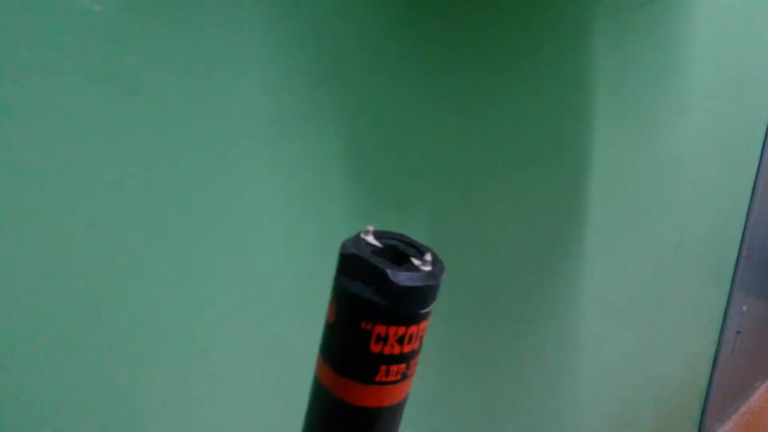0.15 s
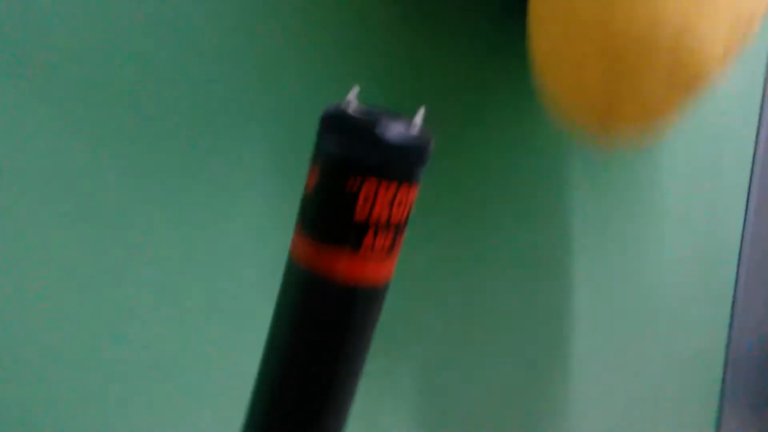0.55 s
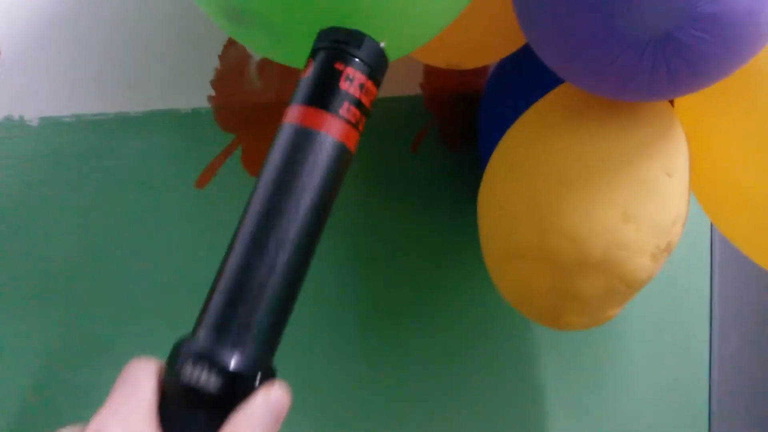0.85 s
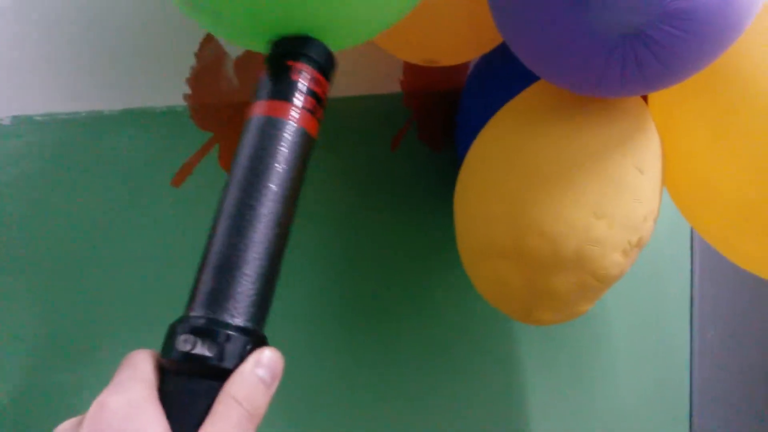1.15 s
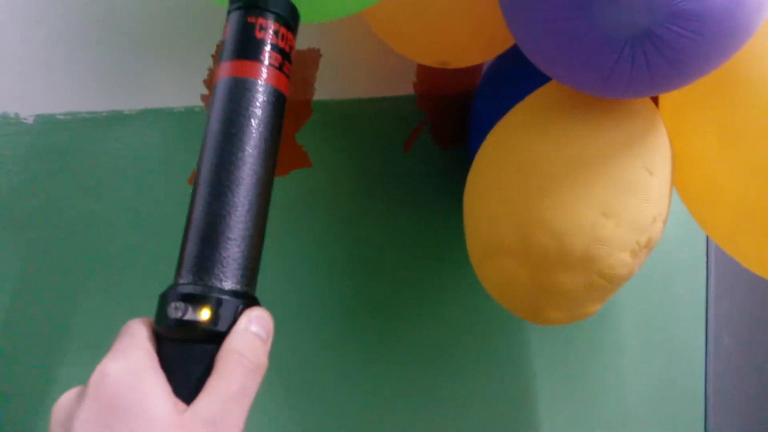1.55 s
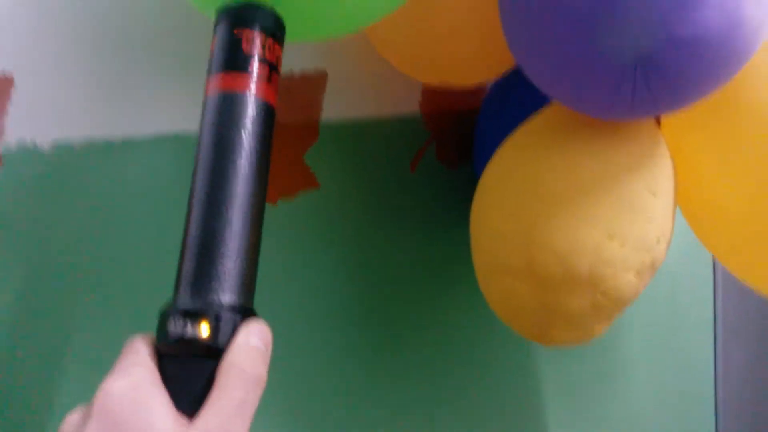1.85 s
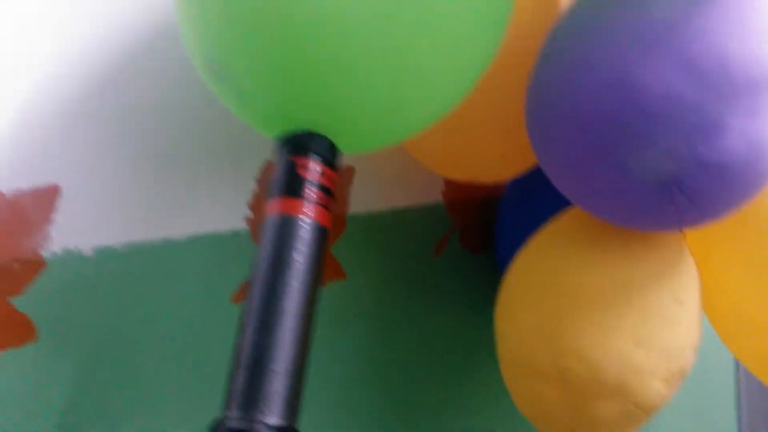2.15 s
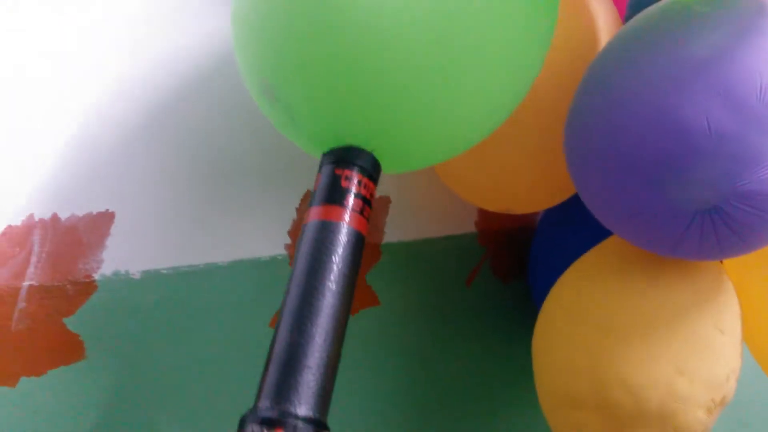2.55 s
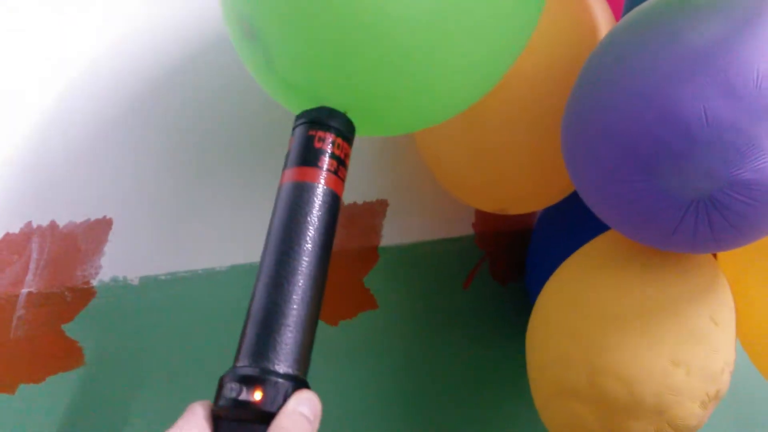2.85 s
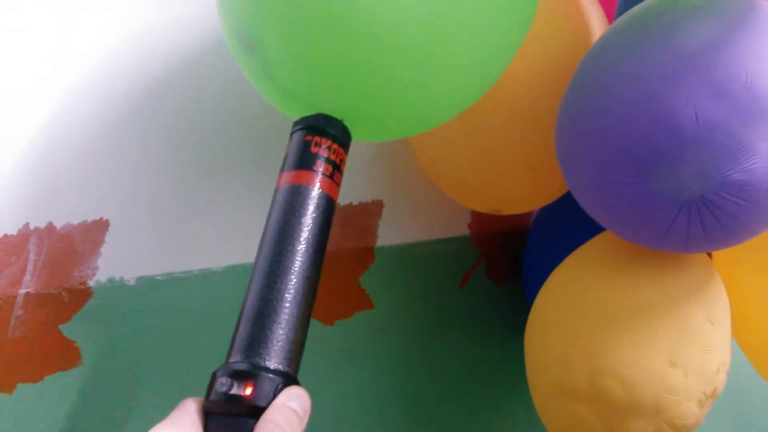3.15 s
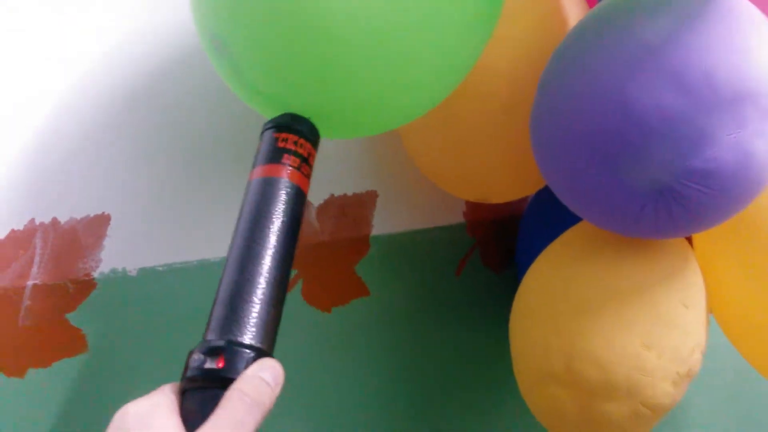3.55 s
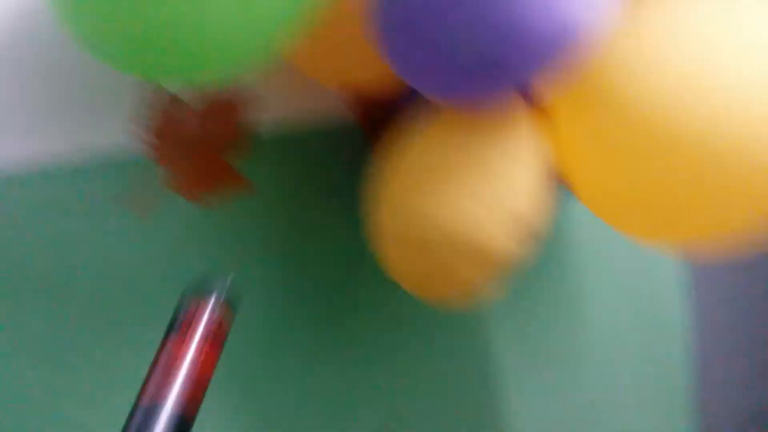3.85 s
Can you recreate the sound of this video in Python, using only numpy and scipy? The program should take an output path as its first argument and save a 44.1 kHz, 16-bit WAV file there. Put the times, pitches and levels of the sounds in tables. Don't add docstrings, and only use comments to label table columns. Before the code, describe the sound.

Harsh electric crackle of a hand-held stun gun, two brief bursts, then a long slowing buzz

```python
import sys
import numpy as np
from scipy import signal
from scipy.io import wavfile
from scipy.ndimage import uniform_filter1d

SR = 44100
rng = np.random.default_rng(int(sys.argv[2]) if len(sys.argv) > 2 else 0)


def ratio(d):
    e = np.asarray(d, float) / 20
    return 10 ** e


def pcm_store(signal):
    levels = np.round(np.clip(np.atleast_2d(signal), -1, 1) * 32767)
    wavfile.write(sys.argv[1], SR, levels.astype(np.int16).T)


N = 176400
RUN_IN_S = .25
PAD = int(RUN_IN_S * SR)

# time_s, rate_hz
ARC_1 = [(0.0, 84.55), (0.1, 78.82), (0.195, 75.61)]
ARC_2 = [(0.368, 85.17), (0.49, 74.6)]
ARC_3 = [(1.603, 87.13), (1.75, 76.05), (2.1, 70.35), (2.5, 65.63), (2.8, 59.72), (3.0, 55.29),
         (3.15, 50.81), (3.28, 44.32), (3.36, 39.42), (3.42, 39.16), (3.745, 38.18)]
ARCS = (ARC_1, ARC_2, ARC_3)
CHARGE_LEFT = [.78, .33, .29]
# time_s, direct_db, hall_db, jolt_left_db, jolt_right_db
REACH = [(0, -0.5, -23, -16, -24), (.37, -0.5, -19.5, -17.5, -29), (0.502, 0, -25.5, -17, -34),
         (1.6, -5, -22, -18, -24.5), (1.9, -6, -22, -23, -32), (2.2, -6, -21.5, -24.5, -29),
         (2.33, -7.5, -21.5, -20, -25), (2.45, -6.5, -20.5, -25.5, -29), (2.7, -7.5, -22, -25.5, -31.5),
         (3.1, -6, -22.5, -22, -27.5), (3.75, -4.5, -21.5, -34, -37)]
# time_s, treble_share_0_1
AIM = [(0, 0.43), (.3, 0.36), (.6, 0.27), (1.6, 0), (2.0, 0.36), (2.6, 0), (3.201, 0.09), (3.801, 0.05)]
# left_ms, left_db, right_ms, right_db
NEAR_BOUNCES = [(0.1, 0, 0, 0), (1.35, -9, .9, -7), (1.85, -6, 1.7, -6), (3.3, -17, 3.2, -13),
                (4.0, -17, 3.9, -14), (6.0, -16, 6.0, -11), (6.4, -13, 6.4, -13)]
# left_ms, left_db, right_ms, right_db
FAR_BOUNCES = [(0.1, 0, 0, 0), (1.3, 1, 1.0, -1), (2.3, -5, 1.7, -2), (3.1, -6, 3.3, -6),
               (4.3, -3, 4.2, -4), (5.2, -6, 4.9, -9), (7.6, -10, 8.4, -8)]
# band_hz, t60_s
HALL_T60 = [(200, 1.33), (1000, 1.41), (2600, 0.94), (5000, 0.61), (7500, 0.64), (10000, 0.36),
            (13000, 0.069)]
# band_hz, level_db
HALL_COLOUR = [(200, 17.5), (4000, 1.5), (9000, 0), (13000, 12.5)]
# left_hz, right_hz, width_hz, level_db
PORTS = [(3130, 2400, 3000, -20), (4996, 5010, 1224, -1.5), (7370, 8190, 843, 1),
         (13500, 12450, 2600, -17.5), (6760, 6700, 440, -10.5), (5250, 5475, 473, -6)]
PORT_SIGNS = [1, -1, 1, 1, 1, -1]
# time_s, left_swing, right_swing
OVERLOADS = [(-.002, -0.55, -0.38), (.0095, -0.5, -0.3), (0.033, -0.13, -0.16), (.0703, -0.2, 0.023),
             (0.0834, -.09, -0.073), (0.0947, 0.13, -0.27), (0.1208, -0.036, 0.69), (0.1463, -0.31, -0.079),
             (.1727, -0.2, -0.021), (0.372, 0.11, -0.17), (0.4466, 0.23, 0.076)]
SWITCH_S = [
    .3655,
    1.596,
    3.746,
]
SWITCH_DB = [-21, -16]
SWITCH_GRIP_DB = [-8, 1.5, 5.5]
# start_s, level_db, left_minus_right_db
STEPS = [(.04, -37, -5), (0.637, -36, -4.5), (1.203, -37, -4.5), (1.795, -39, -8), (2.405, -37.5, -7),
         (3.0, -42, -11.5), (3.62, -31, -3.5)]
# band_hz, level_db
STEP_COLOUR = [(50, -32), (130, -15.5), (330, -0.5), (500, -5.5), (700, -7), (1000, -19), (1500, -20),
               (3000, -38)]
# time_s, level_db
RUSTLE = [(0.75, -77), (0.814, -67), (0.868, -56), (1.082, -80), (1.306, -87), (1.318, -72.5),
          (1.482, -53.5), (1.59, -62)]
# centre_hz, width_hz, level_db
CLOTH = [(3000, 1700, -5.5), (7360, 1760, 2), (5300, 1200, -6)]
# start_s, length_s, level_db
SCRAPES = [(3.937, .012, -30), (3.953, .013, -31), (3.968, .016, -31), (3.987, .013, -29)]
# centre_hz, width_hz, level_db
SQUEAKS = [(3470, 970, -7), (7350, 2700, -9)]
# time_s, swing
KNOCKS = [(3.938, .03), (3.948, .09), (3.981, .05), (3.998, .05)]
# band_hz, level_db
FLOOR = [(18, -44), (30, 23), (158, -58), (337, 12), (680, 8), (1480, -15), (5440, -14.5), (7240, -5),
         (15000, -60)]


def rms_one(x):
    return x / np.sqrt(np.mean(x ** 2) + 1e-20)


def butter(x, order, hz, kind="low"):
    return signal.sosfilt(signal.butter(order, hz, kind, fs=SR, output="sos"), x)


def place(seconds, sizes):
    track = np.zeros(N + PAD) + 1e-18
    at = np.round(np.asarray(seconds) * SR).astype(int) + PAD
    np.add.at(track, np.clip(at, 0, N + PAD - 1), sizes)
    return track


def resonate(x, hz, width_hz):
    r = np.exp(-np.pi * width_hz / SR)
    poles = [1, -2 * r * np.cos(2 * np.pi * hz / SR), r * r]
    return signal.lfilter([(1 - r * r) / 2, 0, (r * r - 1) / 2], poles, x)


def resonate_twice(x, hz, width_hz):
    return resonate(resonate(x, hz, width_hz), hz, width_hz)


def bands(length, colour, dying):
    t = np.arange(length) / SR
    white = rng.standard_normal((2, 2, length))
    colour_hz, colour_db = np.transpose(colour)
    hall_hz, hall_t60_s = np.transpose(HALL_T60)
    edges_hz = 35 * 2 ** np.arange(0, 9.1, .5)
    out = 0
    for k, (low_hz, high_hz) in enumerate(zip(edges_hz, edges_hz[1:])):
        log_hz = np.log(low_hz * high_hz) / 2
        db = np.interp(log_hz, np.log(colour_hz), colour_db)
        t60_s = np.interp(log_hz, np.log(hall_hz), hall_t60_s)
        out = out + ratio(db - dying * 60 * t / t60_s) * butter(white[k % 2], 2, [low_hz, high_hz], "band")
    return out


def ports(x):
    x = butter(x, 3, 1580, "high")
    out = np.zeros(x.shape)
    for row, sign in zip(PORTS, PORT_SIGNS):
        for side in range(2):
            out[side] += sign * ratio(row[3]) * resonate(x[side], row[side], row[2])
    return out


def jolt(track, ms):
    r = np.exp(-1000 / (ms * SR))
    push = signal.lfilter([1], [1, -r], track)
    push = signal.lfilter([1 - r ** 4], [1, -r ** 4], push)
    return butter(push, 2, 83, "high")


def room_noise():
    return ratio(-61) * rms_one(bands(N, FLOOR, 0))


def footfalls():
    likeness, rise_s = 0.76, .004
    t = np.arange(SR) / SR
    out = np.zeros((2, N + 2 * SR))
    for start_s, level_db, pan_db in STEPS:
        noise = bands(SR + 800, STEP_COLOUR, 1)[:, 800:]
        mid, side = butter(noise, 2, 1295)
        boom = np.sqrt(1 + likeness) * mid + np.sqrt(1 - likeness) * side * [[1], [-1]]
        boom = boom * (1 - np.exp(-t / rise_s)) * (1 - t ** 8)
        side_db = pan_db * np.array([[.5], [-.5]])
        start = int(start_s * SR)
        out[:, start:start + SR] += rms_one(boom) * ratio(level_db - 14.5 + side_db)
    return out[:, :N]


def rustle():
    hiss = rng.standard_normal((2, N))
    cloth = rms_one(sum(ratio(db) * resonate_twice(hiss, hz, width_hz) for hz, width_hz, db in CLOTH))
    time_s, level_db = np.transpose(RUSTLE)
    return cloth * ratio(np.interp(np.arange(N) / SR, time_s, level_db, left=-90, right=-90) - 0.5)


def switch_clicks():
    t, t60_s = np.arange(N) / SR, 0.018
    decay = 0
    for start_s, grip_db in zip(SWITCH_S, SWITCH_GRIP_DB):
        decay = decay + (t > start_s) * ratio(grip_db - 60 * np.abs(t - start_s) / t60_s)
    snap = resonate(rng.standard_normal((2, N)) * decay, 8100, 1160)
    return snap * ratio(np.array(SWITCH_DB)[:, None] + 13)


def hand_on_case():
    t = np.arange(N) / SR
    slips_per_s, slip_depth, release_s = 900, .3, .003
    slips = rms_one(uniform_filter1d(rng.standard_normal(N), size=int(SR / slips_per_s)))
    grains = (rng.standard_normal((2, N)) + rng.standard_normal(N)) * np.exp(slip_depth * slips)
    rub = ratio(-1) * rms_one(ports(grains))
    for hz, width_hz, db in SQUEAKS:
        rub = rub + ratio(db) * rms_one(resonate_twice(grains, hz, width_hz))
    rub = rub + ratio(-7.5) * rms_one(resonate(grains, 463, 980))
    stroke = 0
    for start_s, length_s, db in SCRAPES:
        rise = np.clip((t - start_s) / length_s, 0, 1) ** .5
        fall = np.exp(-np.maximum(t - start_s - length_s, 0) / release_s)
        stroke = stroke + ratio(db) * rise * fall
    return rub * stroke + jolt(place(*np.transpose(KNOCKS)), .8)[PAD:]


def spark_times():
    times = []
    for arc, left, before_s in zip(ARCS, CHARGE_LEFT, (RUN_IN_S, 0, 0)):
        time_s, rate_hz = np.transpose(arc)
        t = np.arange(time_s[0] - before_s, time_s[-1], 1 / SR)
        cycles = np.cumsum(np.interp(t, time_s, rate_hz)) / SR - before_s * rate_hz[0] - left
        times.append(np.interp(np.arange(np.ceil(cycles[0]), cycles[-1]), cycles, t))
    return np.concatenate(times)


def hall_tail():
    t = np.arange(int(1.5 * SR)) / SR
    rise_s, air_cut_hz, air_t60_s = .005, 10800, 0.27
    scatter_db, scatter_t60_s = 5, .015
    tail = bands(len(t), HALL_COLOUR, 0.99) * (1 - np.exp(-t / rise_s))
    dull = signal.sosfiltfilt(signal.butter(8, air_cut_hz, fs=SR, output="sos"), tail)
    tail = dull + (tail - dull) * ratio(-60 * t / air_t60_s)
    return tail + rng.standard_normal(tail.shape) * ratio(scatter_db - 60 * t / scatter_t60_s)


def luck(*shape):
    return np.clip(rng.standard_normal(shape), -1.7, 1.7)


def spark_cracks(spark_s, own_db):
    bounce_jitter_ms, bounce_spread_db, hall_jitter_ms = .014, 1.6, .014
    when_s, direct_db, hall_db = np.transpose(REACH)[:3]
    direct_db = np.interp(spark_s, when_s, direct_db) + own_db
    hall_db = np.interp(spark_s, when_s, hall_db) + own_db
    paths = np.where((spark_s < 1)[:, None, None], np.array(NEAR_BOUNCES), np.array(FAR_BOUNCES))
    feed = place(spark_s + hall_jitter_ms / 1000 * luck(len(spark_s)), ratio(hall_db))
    tail = hall_tail()
    air = []
    for side in range(2):
        late_ms, bounce_db = paths[:, :, 2 * side], paths[:, :, 2 * side + 1]
        late_s = (late_ms + bounce_jitter_ms * luck(*late_ms.shape)) / 1000
        bounce_db = bounce_db + bounce_spread_db * luck(*bounce_db.shape)
        cracks = place(spark_s[:, None] + late_s, 5.55 * ratio(bounce_db + direct_db[:, None]))
        air.append(cracks + signal.fftconvolve(feed, tail[side])[:N + PAD])
    air = np.array(air)
    share = np.clip(np.interp(np.arange(-PAD, N) / SR, *np.transpose(AIM)), 0, 1)
    return ports(air - share * np.roll(air, 1, axis=1))


def spark_jolts(spark_s):
    jolt_ms, sag_ms, sag_db, spread_db = 0.16, 0.96, -17, 3.0
    when_s, _, _, *jolt_db = np.transpose(REACH)
    overload_s, *swings = np.transpose(OVERLOADS)
    count = len(spark_s)
    polarity = [1, np.tanh(2 * luck(count))]
    low = []
    for side in range(2):
        size = ratio(np.interp(spark_s, when_s, jolt_db[side]) + spread_db * luck(count)) * polarity[side]
        sags = place(spark_s + .0003, ratio(sag_db) * size * luck(count))
        sags = sags + place(overload_s, swings[side])
        low.append(jolt(place(spark_s, 1.86 * size), jolt_ms) + jolt(1.1 * sags, sag_ms))
    return np.array(low)


def arcs():
    spark_s = spark_times()
    own_db = 1.2 * luck(len(spark_s))
    return (spark_cracks(spark_s, own_db) + spark_jolts(spark_s))[:, PAD:]


def scene():
    return room_noise() + footfalls() + rustle() + switch_clicks() + hand_on_case() + arcs()


def roll_off(x):
    return signal.sosfilt(signal.butter(12, 15900, fs=SR, output="sos"), x)


def record(dry):
    t = np.arange(N) / SR
    duck_db, recover_db_per_s = 13, 8
    down_db = np.zeros(N)
    for arc in ARCS:
        on_s, off_s = arc[0][0] - .01, arc[-1][0]
        recovering_db = duck_db - recover_db_per_s * np.maximum(t - off_s, 0)
        down_db = np.maximum(down_db, np.where(t < on_s, 0, recovering_db))
    x = dry * ratio(duck_db - down_db)
    x = 1.5 * np.tanh(x / 1.5)
    mix = signal.sosfilt(signal.cheby1(8, .5, 14700, fs=SR, output="sos"), x)
    return roll_off(mix)


dry = scene()
out = record(dry)
pcm_store(out)
```